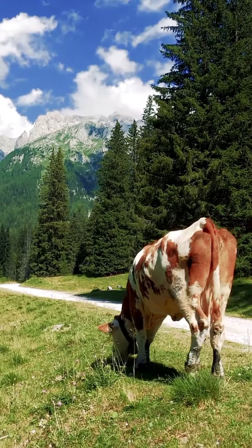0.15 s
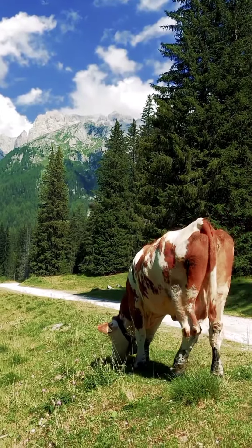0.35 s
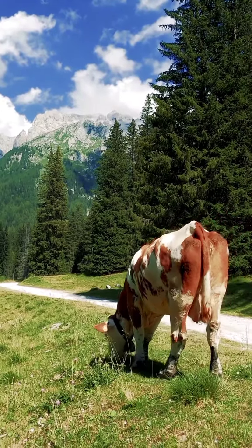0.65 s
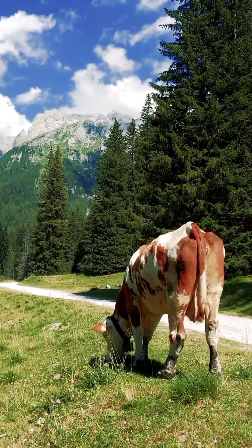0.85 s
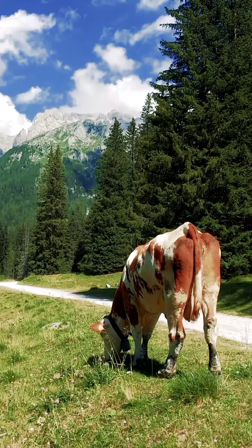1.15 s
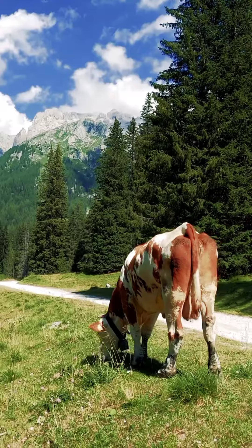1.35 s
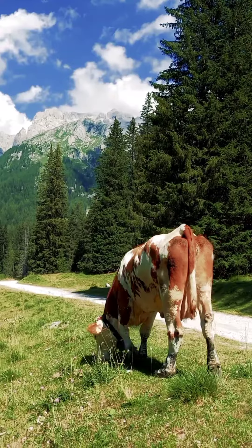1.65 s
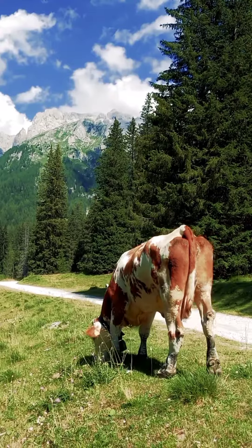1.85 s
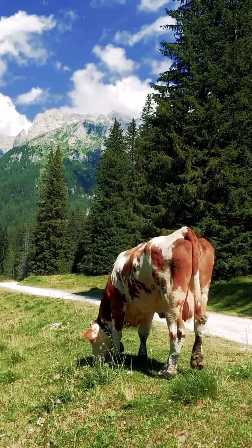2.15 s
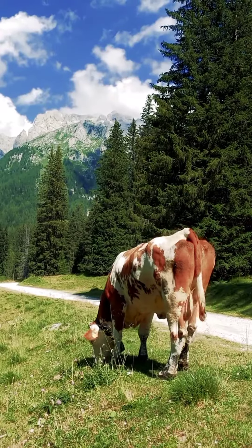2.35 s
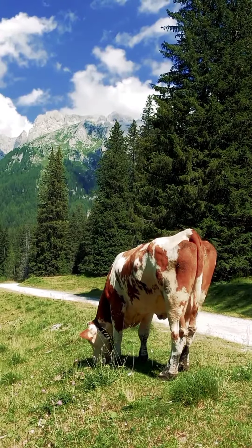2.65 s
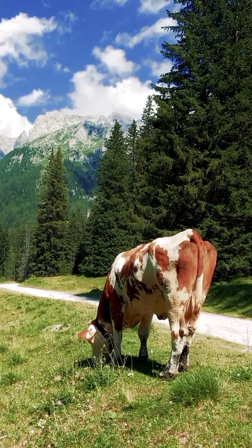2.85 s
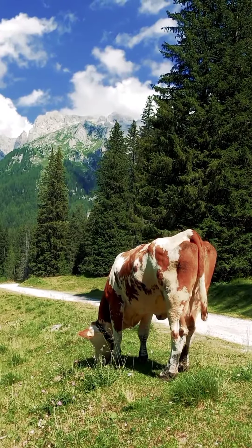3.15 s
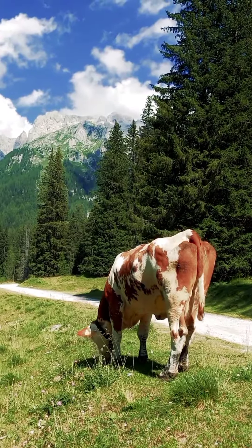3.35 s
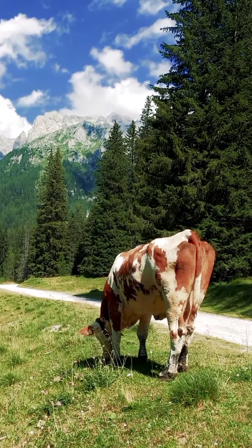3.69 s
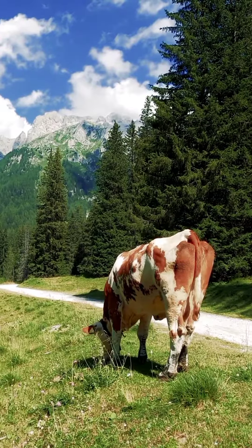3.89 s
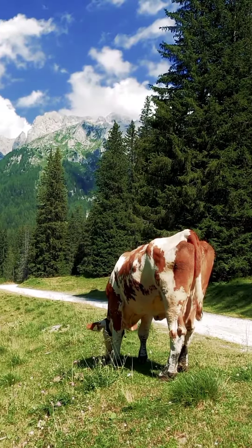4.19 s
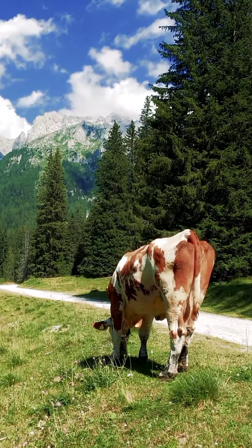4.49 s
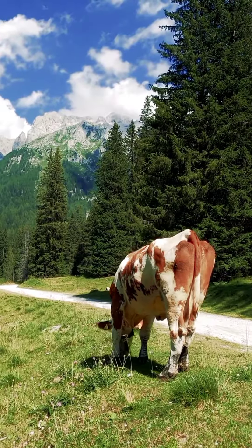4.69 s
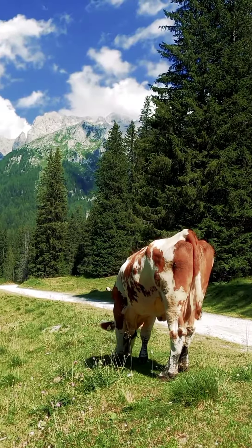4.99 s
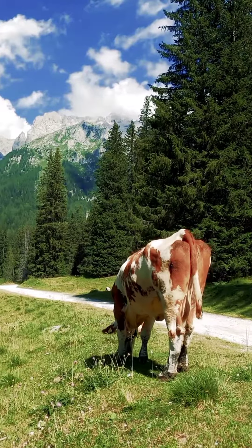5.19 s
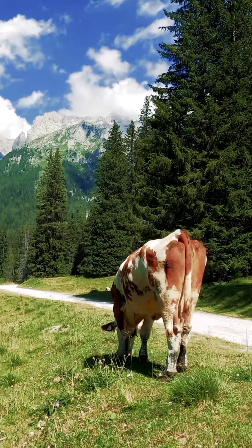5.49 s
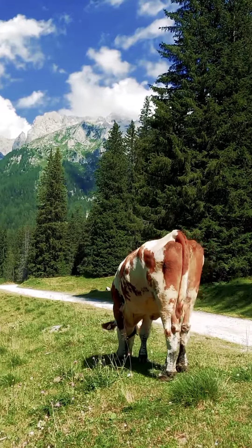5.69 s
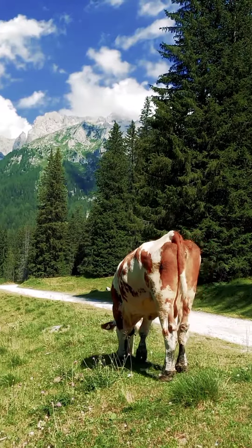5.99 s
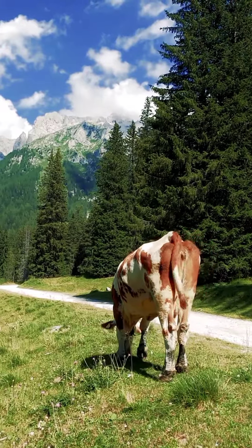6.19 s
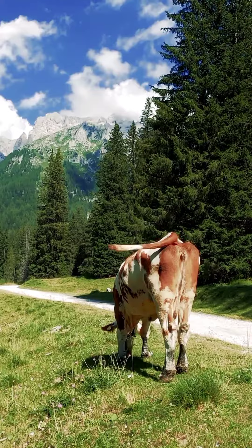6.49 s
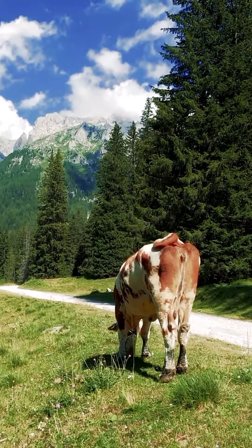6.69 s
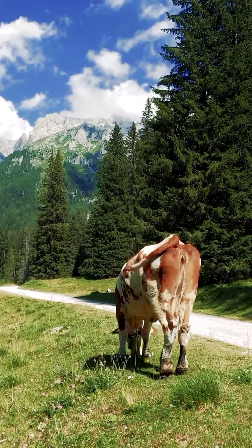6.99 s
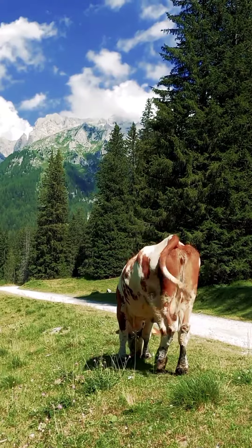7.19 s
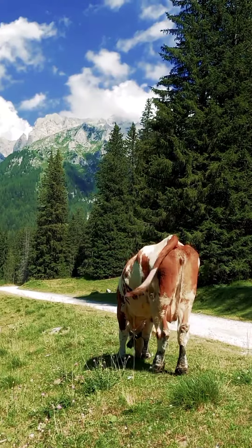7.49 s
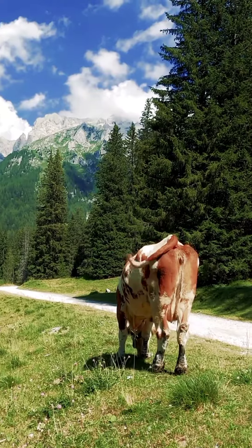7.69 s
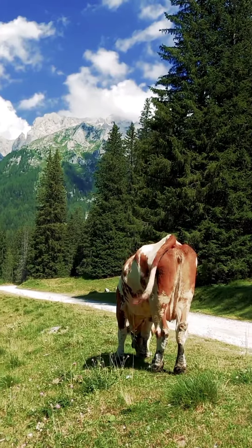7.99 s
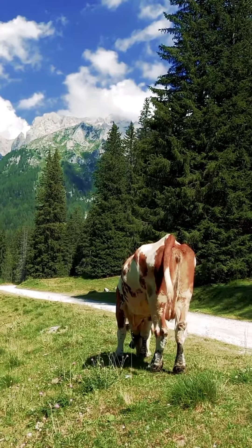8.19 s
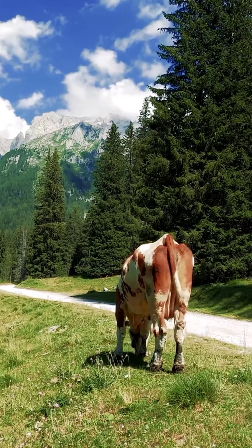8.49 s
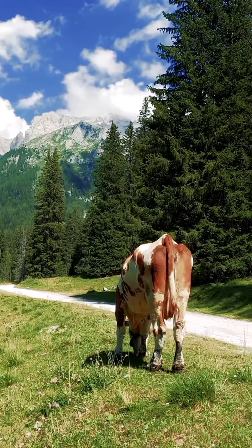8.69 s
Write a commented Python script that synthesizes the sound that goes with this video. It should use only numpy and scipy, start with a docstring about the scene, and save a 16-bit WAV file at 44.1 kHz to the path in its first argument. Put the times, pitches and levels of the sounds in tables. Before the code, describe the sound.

A dull sheet-metal cowbell sounds nearby in an open pasture. A strong hollow clank comes at 0.1 s with a brush of grass, another at 0.35, then uneven softer knocks, with a quick cluster of bright taps around 1.4-1.7. Each blow cracks, chatters and rebounds, leaving a short hollow ring near 550 Hz with thinner, longer overtones. Between 2 and 4 s come medium clanks and pairs, with a small clapper rattle near 3.8. A softer distant bell dings occasionally, mostly before 3 s and again around 6.3-6.6. Wind swells from 3.3 to 5.8 s, rumbling and thumping low on the microphone while strikes grow sparse. Two firm clanks fall near 5.6-5.7, a loud one at 6.4, more through 7.2, peaking at 7.14. After light rattling and a lull, brighter bursts come at 8.05 and 8.4-8.6, fading in faint taps over quiet hush.

```python
"""Cowbell on a windy pasture

A grazing cow swings her sheet-metal bell: the clapper hits, bounces and rattles, and the bell rings on.
The bell is a set of decaying sine waves; each blow's hardness and landing spot set their strengths.
A second bell sounds from far away, and the forest edge answers the near bell with a faint noise-like tail.
Shaped noise makes the contact cracks and chatter, brushing grass, gusts and outdoor hush;
low sine pulses make wind thumps."""
import sys
import numpy as np
from scipy import signal
from scipy.fft import rfft, irfft, next_fast_len
from scipy.io import wavfile
from scipy.ndimage import map_coordinates

SR = 44100
rng = np.random.default_rng(int(sys.argv[2]) if len(sys.argv) > 2 else 0)


def put_to_file(sound):
    """Save the sound as 16-bit audio at rate SR, in the file named by the first command-line argument."""
    columns = np.atleast_2d(sound).T  # one column per channel
    safe = np.clip(columns, -1, 1)
    whole_steps = np.round(safe * 32767)
    wavfile.write(sys.argv[1], SR, whole_steps.astype(np.int16))


N = 390285

# Clapper blows: t/s, strength/dB, hardness of the contact/(dB per octave),
# landing spot round the mouth/turns, height on the wall (-1 lip to 1 shoulder)
STRIKES = [(0.1403, -18, -2.5, 0.44, 0.39), (0.3528, -25.0, 1, 0.608, -0.6),
           (0.5431, -33.5, -2.5, 0.102, -0.56), (0.836, -26.3, -2, 0.594, 0.2),
           (0.901, -40, 2, 0.612, -0.7), (1.0087, -30.5, -0.5, 0.584, 0.0076),
           (1.2522, -34.5, 2.5, 0.508, -0.33), (1.4458, -24.5, 2.5, 0.88, 0.034),
           (1.4633, -34, 5.5, 0.188, -0.86), (1.5267, -32, 1.3, 0.782, 0.057),
           (1.617, -36.5, 4.2, 0.146, -0.049), (1.721, -38, 0.5, 0.21, -0.28), (2.018, -33, 4, 0.048, 0.52),
           (2.173, -33, -3, 0.382, -0.42), (2.4854, -40, 8.5, 0.906, 0.42),
           (2.608, -27.5, 0.7, 0.692, -0.26), (2.888, -25, -2, 0.326, -0.34),
           (3.124, -27.5, -1.3, 0.338, -0.94), (3.145, -34, 6, 0.38, 0.05),
           (3.461, -26.5, 0.5, 0.776, 0.63), (3.4957, -33, 2, 0.886, 0.19), (3.548, -34, 3.5, 0.896, 0.6),
           (3.7445, -35, 4, 0.618, -0.95), (3.7929, -32, 1.6, 0.866, -0.13), (3.844, -32, 1, 0.85, -0.6),
           (3.9464, -29.5, -0.75, 0.102, -0.39), (4.2928, -41.5, 3.5, 0.88, 0.45),
           (4.519, -38.5, 2, 0.232, 0.58), (4.86, -32, 1.5, 0.632, -0.19), (5.107, -33.5, 7, 0.532, -0.51),
           (5.128, -30.5, 3, 0.838, -0.091), (5.596, -26.5, -0.6, 0.036, 0.47),
           (5.7313, -26.5, -2.0, 0.994, -0.14), (5.792, -36, 1, 0.982, -0.019),
           (6.063, -37, 0.4, 0.1, 0.39), (6.366, -19, -0.5, 0.684, 0.082),
           (6.4519, -23.5, 0.0, 0.822, 0.56), (6.6345, -28.5, -2, 0.968, -0.94),
           (6.845, -29, -0.5, 0.65, 0.44), (6.882, -32, -1.5, 0.884, 0.75),
           (7.093, -26, -1.5, 0.718, -0.23), (7.139, -18, -1.7, 0.034, 0.16),
           (7.1976, -24, -0.5, 0.312, 0.33), (7.327, -36.5, 2.5, 0.328, 1), (7.7217, -38.5, 7, 0.18, 0.33),
           (8.056, -23, 0.5, 0.88, -0.27), (8.089, -24, -2.7, 0.974, -1), (8.148, -30, -0.2, 0.552, -0.93),
           (8.4246, -23.5, 1, 0.726, 0.21), (8.4617, -26.5, 1.5, 0.72, 0.51),
           (8.4973, -31.5, 2, 0.514, 0.2), (8.5673, -37.5, 2.5, 0.708, 0.24),
           (8.7221, -38.5, 5.5, 0.946, -0.46)]
# Strong modes (ways the bell vibrates): f/Hz, level/dB, time to fall 60 dB/s,
# swing with landing spot/dB, phase of the wave round the mouth/turns, gain at the shoulder/dB
BELL = [(548.4, 0.5, 0.69, 3.4, 0.5, 1.5), (1201.8, -25, 2.06, 4, 0.6, -9),
        (1446.2, -15.5, 1.27, 6, 0.53, 11), (2364, -13.5, 0.37, 9.5, 0.29, -13),
        (2411, -12, 0.2, 11, 0.57, -2), (3010, -8.5, 0.053, 8, 0.76, 3.5), (3373, -7, 0.16, 8, 0.86, 4.5),
        (3715, -7.5, 0.28, 10.5, 0.18, -10)]
# Upper modes of the bell: f/Hz, relative level/dB
UPPER = [(4021, -6), (4265, 0), (4511, 0), (4917, -8), (5127, -9), (5283, -8), (5443, -2), (5507, -3),
         (5755, -6), (6056, -4), (6388, 0), (6584, -8), (6887, -5), (6950, -7), (7165, -12), (7278, -11),
         (7973, -9), (8053, -10), (8328, -8), (8834, -13), (9523, -12), (9792, -15)]
# Times when the clapper dances on the wall: t/s, length/s, relative level/dB
RATTLES = [(1.781, 0.04, -39.5), (2.238, 0.16, -45), (3.767, 0.048, -30), (4.53, 0.075, -42),
           (7.748, 0.054, -43), (8.745, 0.077, -41)]
PIVOT_HZ = 2000  # hardness tilts the strong modes around this pitch


def amp(db):
    """Turn decibels into a gain."""
    return 10 ** (np.asarray(db) / 20)


def unit(x):
    """Scale to an rms (average strength) of 1."""
    return x / np.sqrt(np.mean(x ** 2) + 1e-20)


def fade(t, t60):
    """Die away freely, 60 dB down after t60 seconds."""
    return np.exp(-np.log(1000) * t / t60)


def swell(s, half_s):
    """Make a smooth bump of height 1 around a moment."""
    return np.exp(-((np.arange(N) / SR - s) / half_s) ** 2)


def along(points, hz):
    """Read a value between (Hz, value) points on a log pitch axis."""
    f, v = np.transpose(points)
    return np.interp(np.log(hz + 1), np.log(f + 1), v)


def wobble(rate):
    """Make a smooth random curve through rate random points a second."""
    return map_coordinates(rng.standard_normal(int(N * rate / SR) + 4), [np.arange(N) * rate / SR])


def filtered(x, response):
    """Multiply each frequency of a sound by a given response."""
    m = next_fast_len(N + SR // 2)
    return irfft(rfft(x, m) * response(np.fft.rfftfreq(m, 1 / SR)), m)[:N]


def noise(spectrum):
    """Make coloured noise of rms 1."""
    return unit(filtered(rng.standard_normal(N), lambda hz: amp(along(spectrum, hz))))


def add(track, start, sound):
    """Mix a sound into a track from a start sample."""
    track[start:start + len(sound)] += sound[:N - start]


def meadow_hush(level_db, drift_db):
    """Outdoor hush: soft coloured noise whose level drifts slowly."""
    # colour of the hush: f/Hz, relative density/dB
    spectrum = [(30, 0), (1500, -8.5), (3000, -14), (8000, -29), (15000, -77)]
    return amp(level_db + drift_db * wobble(2.846)) * noise(spectrum)


def wind(level_db, lump_db, bright_db, flutter_db, thump_db, thump_hz):
    """Eddies buffet the microphone; strong ones give one low push each and flutter higher in pitch."""
    # course of the gusts: t/s, relative level/dB
    gusts = [(0.0, -34), (0.24, -39.5), (0.37, -54), (1.28, -45.5), (1.6, -62), (1.87, -35), (2.46, -31.5),
             (2.55, -46.5), (2.8, -53.5), (3.4, -23.5), (3.78, -21.5), (3.929, -28), (4.3, -30),
             (4.38, -37.5), (4.73, -22), (4.83, -34), (4.97, -23), (5.36, -30), (5.74, -26), (6.07, -44),
             (6.21, -30), (7.93, -33.5), (8.01, -44.5), (8.85, -54.5)]
    # colour of the buffeting: f/Hz, relative density/dB
    buffet = [(20, 2), (70, -0.5), (120, -5), (200, -10), (320, -23), (500, -27.5), (900, -44), (3000, -96)]
    # single strong eddies: t/s, relative level/dB
    thumps = [(3.378, -20.5), (3.682, -22), (4.041, -23.5), (4.722, -20.5), (5.01, -19), (5.149, -19.5),
              (5.284, -20.5), (5.421, -22), (5.642, -27), (6.251, -23)]
    thump_s = 0.035  # half length of the extra flutter at a thump
    strong_gust_db = -24.5  # stronger gusts get extra flutter, weaker ones less
    t = np.arange(N) / SR
    flow = amp(np.interp(t, *np.transpose(gusts)))
    thump_flow = sum(amp(db) * swell(s, thump_s) for s, db in thumps)
    gust_db = 20 * np.log10(np.hypot(flow, thump_flow))
    eddies = unit(noise(buffet) * amp(lump_db * np.tanh(wobble(35))))
    # the flutter is the part of the eddies above about 250 Hz
    flutter = filtered(eddies, lambda hz: hz ** 2 / (hz ** 2 + 250 ** 2))
    force_db = 0.4 * (gust_db - strong_gust_db) + bright_db + flutter_db * np.tanh(wobble(20))
    pushes = np.zeros(N)
    for s, db in thumps:
        hz = thump_hz * 2 ** rng.uniform(-0.3, 0.45)
        pushes += amp(db + thump_db) * swell(s, thump_s / 2) * np.sin(2 * np.pi * hz * (t - s))
    rumble = flow * (eddies - flutter)
    return amp(level_db) * (rumble + amp(gust_db + force_db) * flutter) + pushes


def bell_modes(crowd_db, upper_t60, count):
    """The bell's strong and upper modes plus a crowd of weak overtones: Hz, gain, t60."""
    # shape of the crowd of weak modes: f/Hz, relative level/dB
    overtones = [(4000, 4.5), (7000, 8), (7700, -13.5), (8400, 4), (9600, 1), (10500, -4), (11700, -5.5),
                 (15500, -26.5)]
    hz, db, t60, *_ = np.transpose(BELL)
    upper_hz, upper_db = np.transpose(UPPER)
    crowd_hz = np.linspace(overtones[0][0], overtones[-1][0], count) + rng.uniform(-38.0, 40, count)
    crowd = amp(crowd_db) * unit(amp(along(overtones, crowd_hz))) / np.sqrt(count)
    high_hz = np.r_[upper_hz, crowd_hz]
    # among these, the higher a mode, the sooner it dies
    high_t60 = upper_t60 * (high_hz / upper_hz[0]) ** -.4
    return np.r_[hz, high_hz], np.r_[amp(db), amp(upper_db), crowd], np.r_[t60, high_t60]


def blow(modes, strength_db, hardness, spot, height, scatter_db, bright):
    """Hard contact favours the treble; the landing spot picks among the strong modes."""
    upper_db = -4.5  # all upper modes together, against the blow's strength
    hz, gain, _ = modes
    *_, swing_db, best_phase, shoulder_db = np.transpose(BELL)
    low, high = slice(len(BELL)), slice(len(BELL), None)
    # each higher mode fits one more wave round the mouth
    waves = 2 + np.arange(len(BELL))
    place_db = swing_db * np.cos(2 * np.pi * (waves * spot - best_phase)) + shoulder_db * height
    hardness_db = hardness * np.log2(hz[low] / PIVOT_HZ)
    strong = gain[low] * amp(strength_db + hardness_db + place_db)
    # hardness raises the upper modes as if about 1.6 octaves above the pivot
    level_db = strength_db + upper_db + 1.64 * hardness
    # loud blows reach higher, hard ones crowd the energy into the lowest upper modes
    tilt_db = (bright * (level_db + 34) - 1.54 * hardness) * np.log2(hz[high] / hz[high][0])
    # chance also shares out their energy
    upper = gain[high] * amp(tilt_db + scatter_db * rng.standard_normal(len(tilt_db)))
    return np.r_[strong, amp(level_db) * upper / np.linalg.norm(upper)]


def cowbell(modes, scatter_db, attack_cycles, bright):
    """Each blow checks the old ringing, more so when strong, and adds its own energy to every mode."""
    humming_db = -37  # the lowest modes still ring from an earlier swing
    check_db = -37.5  # a blow of this strength takes half the energy out of the old ringing
    hz, gain, t60 = modes
    pushes = [amp(humming_db) * np.sqrt(gain) * (hz < PIVOT_HZ)]
    pushes += [blow(modes, *row, scatter_db, bright) for s, *row in STRIKES]
    kept = [0] + [1 / np.hypot(1, amp(row[1] - check_db)) for row in STRIKES]
    starts = [0] + [round(row[0] * SR) for row in STRIKES] + [N]
    t = np.arange(np.diff(starts).max() + 1) / SR
    free = np.exp(2j * np.pi * np.outer(hz, t)) * fade(t, t60[:, None])
    # every mode builds up over a few of its own cycles: the treble speaks first
    onset = free[:, :SR // 20] * np.exp(-(np.outer(hz, t[:SR // 20]) / attack_cycles) ** 2)
    out, left = np.zeros(N), np.zeros(len(hz))
    for push, share, start, stop in zip(pushes, kept, starts, starts[1:]):
        size = np.hypot(push, share * abs(left)) + 1e-12
        # a mode that gains much energy starts afresh; the others swing on in step
        fresh = np.clip(1 - abs(left) / size, 0, 1)
        phase = np.angle(left) + fresh * rng.uniform(-np.pi, np.pi, len(hz))
        state = size * np.exp(1j * phase)
        add(out, start, (state @ free[:, :stop - start]).imag)
        # the old motion hands over smoothly to the new
        add(out, start, ((left - state) @ onset).imag)
        left = state * free[:, stop - start]
    return out


def far_bells():
    """The neighbour's bell rings in two fading sines, its blows softened by distance."""
    # the far blows: t/s, level/dB
    far_blows = [(.072, -36), (0.524, -32), (1.222, -44), (1.729, -30), (2.271, -38.5), (2.8, -34.5),
                 (6.27, -43.5), (6.591, -39)]
    # modes of the far bell: f/Hz, relative level/dB, time to fall 60 dB/s
    far_modes = [(771, -2.5, 0.56), (2690, -23, 0.93)]
    out, t = np.zeros(N), np.arange(SR) / SR
    for s, db in far_blows:
        start = round(s * SR)
        ring = np.zeros(SR)
        for hz, level, t60 in far_modes:
            ring += amp(level) * np.sin(2 * np.pi * hz * (t + start / SR)) * fade(t, t60)
        add(out, start, amp(db) * ring * (1 - fade(t, 0.015)))
    return out


def grass(grain_db):
    """Blades of grass brush past each other: short soft swishes of grainy noise."""
    # the swishes: t/s, half length/s, level/dB
    brushes = [(0.142, 0.045, -46.5), (1.008, 0.036, -53.5), (2.128, 0.069, -55), (5.08, 0.18, -55),
               (5.444, 0.1, -60), (7.074, 0.067, -55)]
    # colour of the blades: f/Hz, relative density/dB
    blades = [(500, -14.5), (1800, 15), (5500, 6.5), (9000, -9.5), (14000, -47)]
    swishes = sum(amp(db) * swell(s, half_s) for s, half_s, db in brushes)
    return swishes * unit(noise(blades) * amp(grain_db * wobble(46)))


def clapper(crack_db, crack_t60, chatter_db, chatter_t60, dance_db, width_hz):
    """Each contact cracks, then skids in an uneven chatter coloured by the wall; dancing chatters too."""
    # colour of the contact noise, with a strong hollow hump near 620 Hz: f/Hz, relative density/dB
    contact = [(380, -36.5), (620, 41), (950, -13), (1900, 9.5), (2600, -1.5), (4500, -16.5), (7000, -22),
               (7700, -14), (9500, -15), (15000, -35)]
    crack, chatter, t = np.zeros(N), np.zeros(N), np.arange(SR // 2) / SR
    for s, strength_db, hardness, *_ in STRIKES:
        level_db = strength_db + 0.5 * hardness
        add(crack, round(s * SR), amp(level_db + crack_db) * fade(t, crack_t60))
        add(chatter, round(s * SR), amp(level_db + chatter_db) * fade(t, chatter_t60))
    for s, length, db in RATTLES:
        chatter += amp(db + dance_db) * swell(s + length / 2, length / 2)
    skid = unit(amp(5 * wobble(140)))
    wall_hz = [hz for hz, *_ in [*BELL, *UPPER] if hz > PIVOT_HZ]

    def wall(f):
        """The wall answers strongly near each of its own pitches."""
        return sum(1 / (1 + ((f - hz) / width_hz) ** 2) for hz in wall_hz)

    return crack * noise(contact) + chatter * skid * unit(filtered(noise(contact), wall))


def rattle(modes, tap_rate, tap_db, run_db, bounce_db, bounce_s):
    """Light taps stir only the treble modes: single ones, runs, and two quick rebounds after each blow."""
    # the clapper grazes the wall once: t/s, relative level/dB
    grazes = [(1.036, -24.5), (1.1084, -37.5), (1.6452, -30), (1.8677, -35), (2.213, -27), (2.648, -37),
              (2.6874, -36.5), (2.7482, -40), (2.9867, -41.5), (3.2126, -39), (3.274, -36.5),
              (3.3527, -29.5), (3.994, -45), (4.1104, -38.5), (4.227, -38.5), (5.148, -38), (5.168, -29),
              (5.2778, -31.5), (5.8433, -32), (6.0864, -35.5), (6.992, -41), (7.4011, -45.5),
              (7.459, -34.5), (7.484, -31.5), (7.502, -38), (7.526, -38.5), (7.6954, -33), (7.911, -39),
              (8.6446, -31.5)]
    hz, gain, t60 = (column[modes[0] > PIVOT_HZ] for column in modes)
    t = np.arange(SR) / SR
    rings = np.sin(2 * np.pi * np.outer(hz, t)) * fade(t, t60[:, None])
    rings *= (gain / np.linalg.norm(gain))[:, None]
    # a soft contact favours the lower modes and leaves the highest weak
    rings *= (amp(10 * (hz < UPPER[0][0])) / np.hypot(1, (hz / 7500) ** 2))[:, None]
    taps = [(s, db + tap_db) for s, db in grazes]
    for s, db, hardness, *_ in STRIKES:
        for k in (1, 2):
            delay = k * bounce_s * rng.uniform(0.42, 1.5)
            taps.append((s + delay, db + 0.5 * hardness + k * bounce_db))
    for s, length, db in RATTLES:
        delays = np.r_[0, np.cumsum(rng.uniform(.5, 2, size=20)) / tap_rate]
        varies = rng.normal(0, 1.0, size=21)
        taps += [(s + delay, db + run_db + vary) for delay, vary in zip(delays, varies) if delay < length]
    out = np.zeros(N)
    # each tap stirs the modes in its own random mix
    mixes = rng.standard_normal((len(taps), len(hz)))
    for (s, db), ring in zip(taps, mixes @ rings):
        add(out, min(round(s * SR), N), amp(db) * ring)
    return out


def vary_treble(bell, treble_hz):
    """The bell's treble, above treble_hz, grows and shrinks over time."""
    # course of the treble: t/s, change in level/dB
    course = [(1.8, -2), (2.6, 1), (3.2, 1), (3.8, -5), (7.2, -1.5), (8.1, 0.5), (8.45, 4.5), (8.7, 1.5)]
    treble = filtered(bell, lambda hz: 1 - 1 / (1 + (hz / treble_hz) ** 10))
    return bell + treble * (amp(np.interp(np.arange(N) / SR, *np.transpose(course))) - 1)


def forest(x):
    """Trees scatter a faint late answer, a noise tail whose middle and upper pitches die soonest."""
    # how long the answer lasts: f/Hz, time to fall 60 dB/s
    decay = [(600, 4.06), (3000, 0.57), (12000, 0.86)]
    hz, t, z = signal.stft(rng.standard_normal(SR), SR, nperseg=256)
    tail = signal.istft(z * fade(t, along(decay, hz)[:, None]), SR, nperseg=256)[1]
    # the answer builds up gradually
    tail *= 1 - fade(np.arange(len(tail)) / SR, 0.14)
    return signal.fftconvolve(x, tail / np.linalg.norm(tail))[:N]


def scene():
    """Mix the bells, the forest's answer, wind, grass and the hush of the meadow."""
    air = meadow_hush(level_db=-54.5, drift_db=1.93) + grass(grain_db=3.0)
    air += wind(level_db=3.5, lump_db=4.5, bright_db=-0.5, flutter_db=3, thump_db=3, thump_hz=64.7)
    modes = bell_modes(crowd_db=3.0, upper_t60=0.13, count=130)
    bell = cowbell(modes, scatter_db=6, attack_cycles=3.2, bright=0.08)
    bell += rattle(modes, tap_rate=110, tap_db=-5.0, run_db=-4.5, bounce_db=-5.5, bounce_s=0.0082)
    bell += clapper(crack_db=-13.0, crack_t60=0.06, chatter_db=-12.5, chatter_t60=0.19,
                    dance_db=-12, width_hz=45)
    bell = vary_treble(bell, treble_hz=5200)
    bell += amp(-19) * forest(bell)
    return (bell + far_bells() + air)[None]


def record(dry):
    """Keep only the sound below a sharp upper limit in pitch."""
    top_hz = 15700
    return filtered(dry[0], lambda hz: hz < top_hz)[None]


dry = scene()
out = record(dry)
put_to_file(out)
```